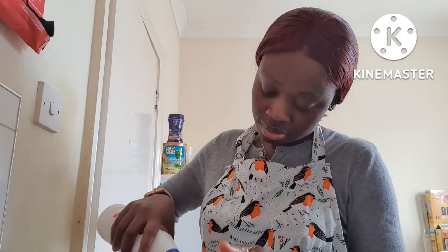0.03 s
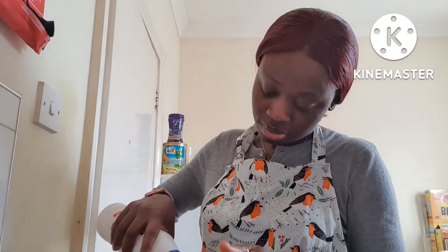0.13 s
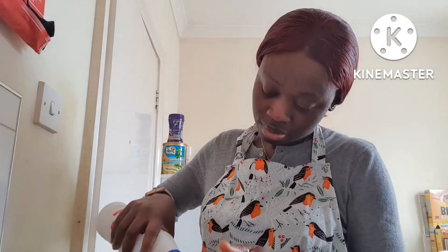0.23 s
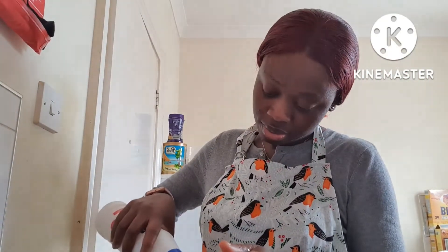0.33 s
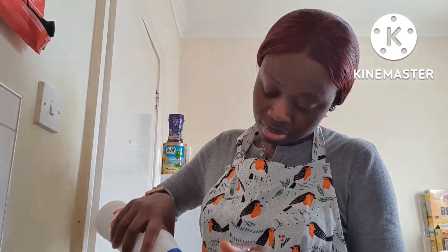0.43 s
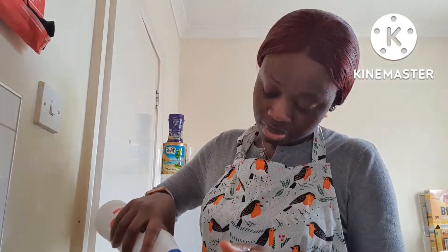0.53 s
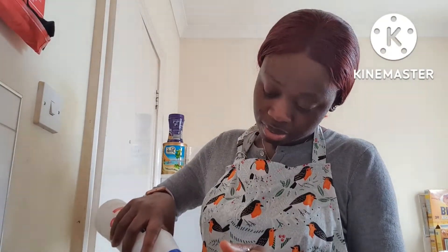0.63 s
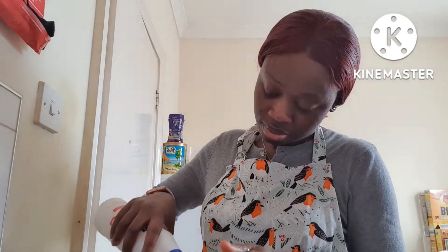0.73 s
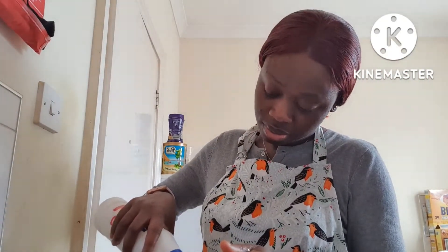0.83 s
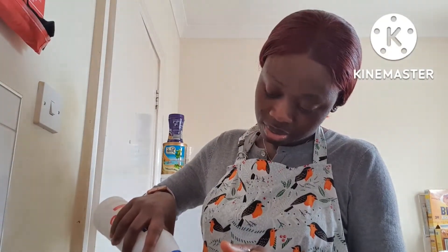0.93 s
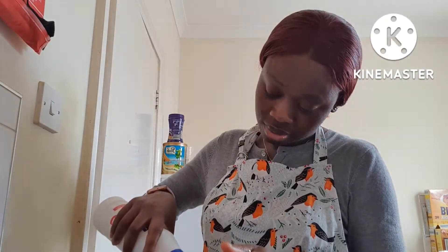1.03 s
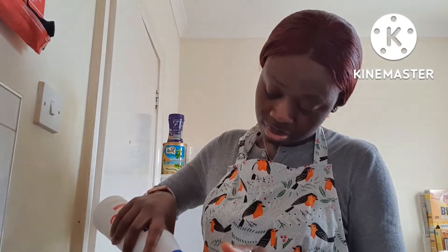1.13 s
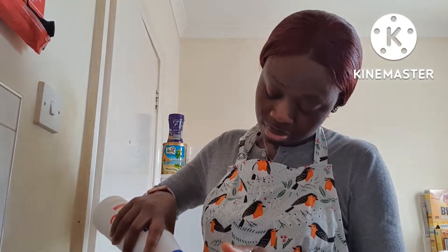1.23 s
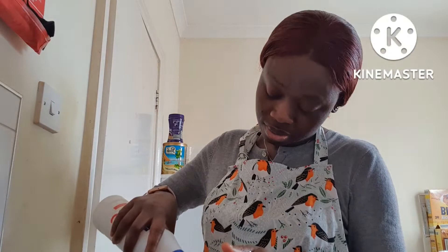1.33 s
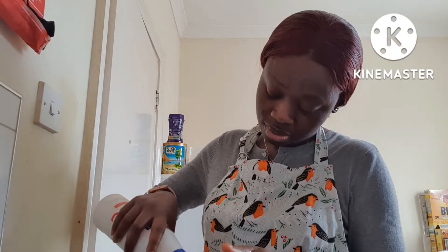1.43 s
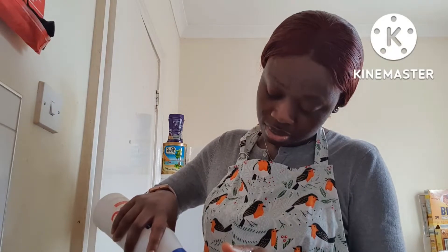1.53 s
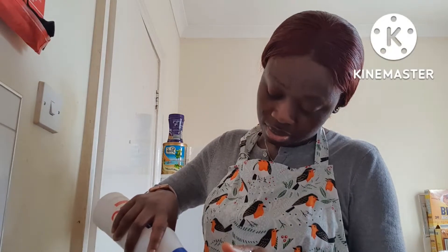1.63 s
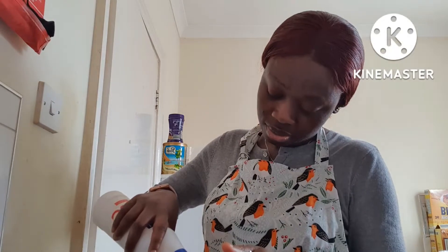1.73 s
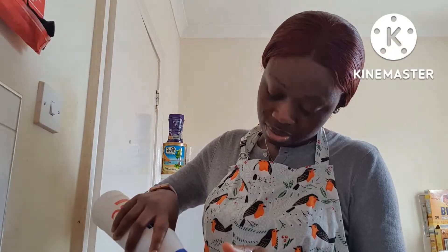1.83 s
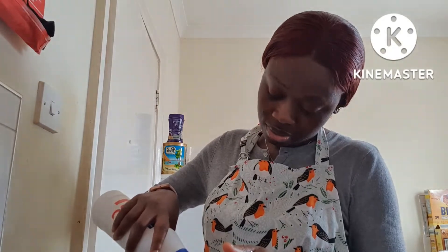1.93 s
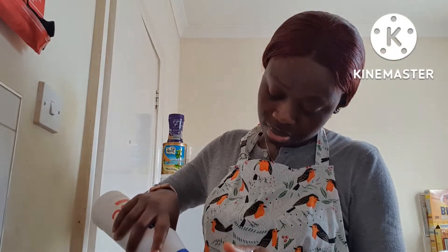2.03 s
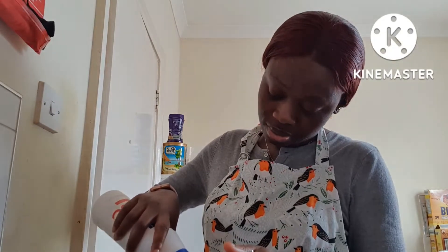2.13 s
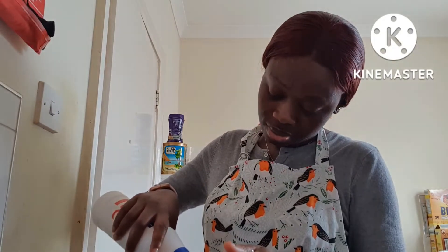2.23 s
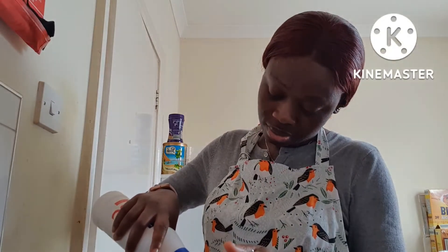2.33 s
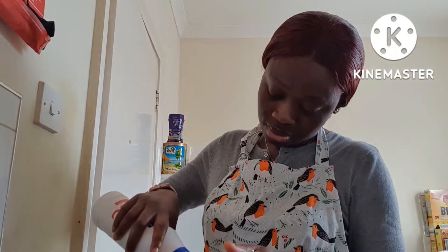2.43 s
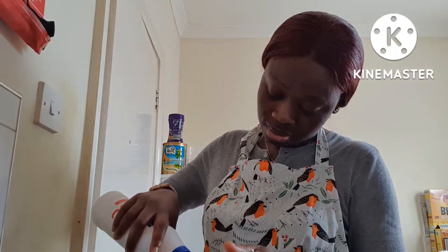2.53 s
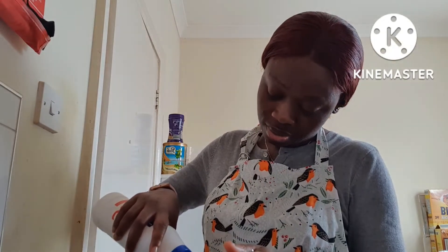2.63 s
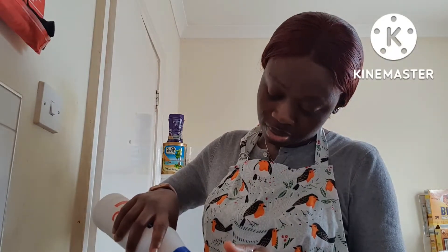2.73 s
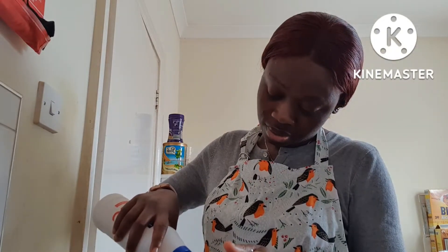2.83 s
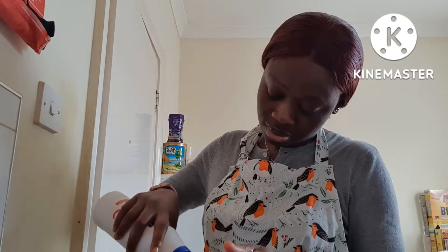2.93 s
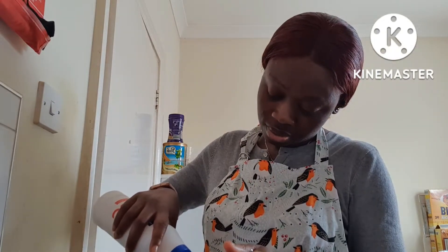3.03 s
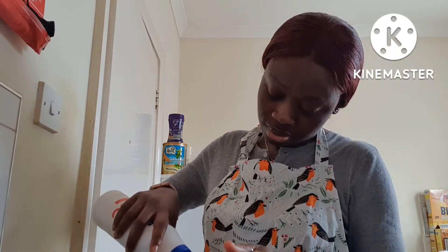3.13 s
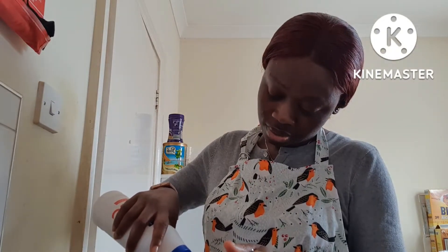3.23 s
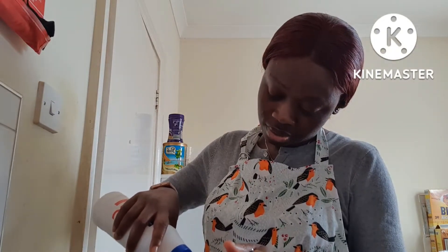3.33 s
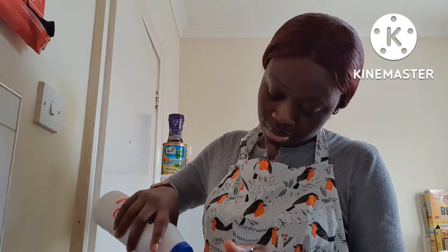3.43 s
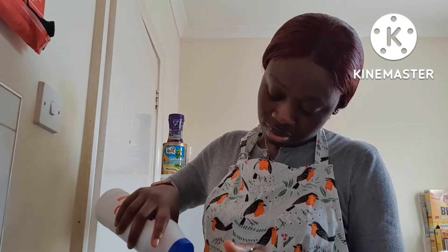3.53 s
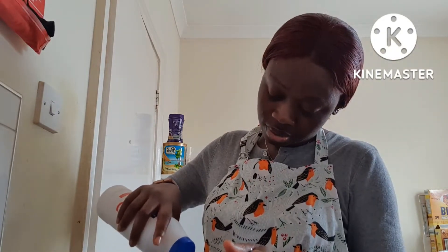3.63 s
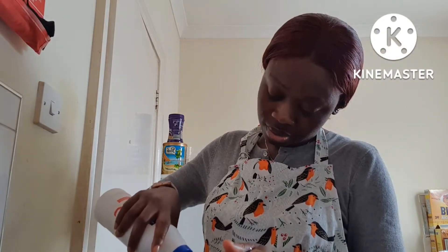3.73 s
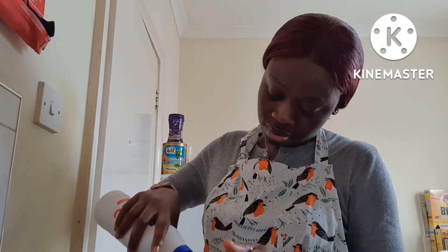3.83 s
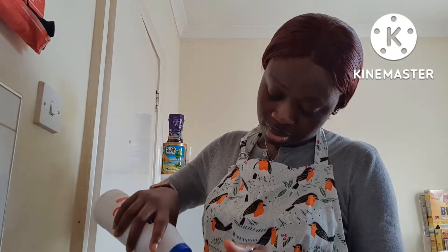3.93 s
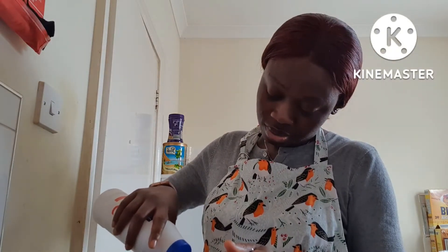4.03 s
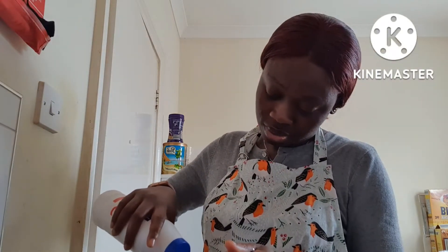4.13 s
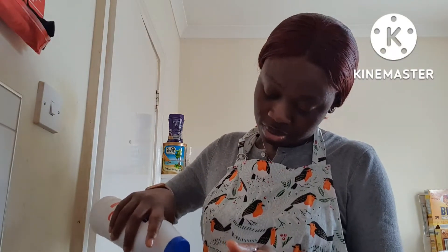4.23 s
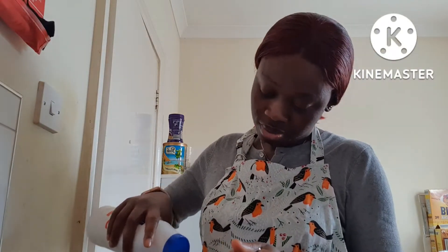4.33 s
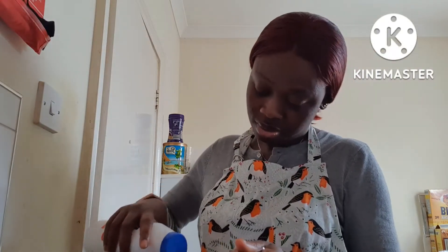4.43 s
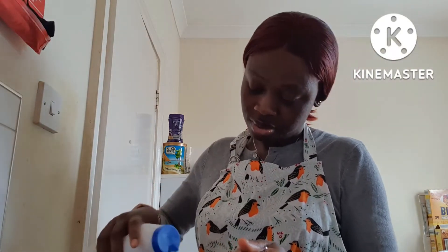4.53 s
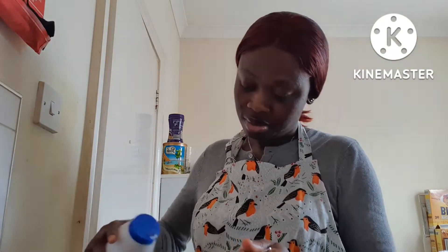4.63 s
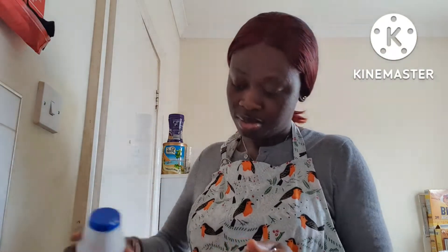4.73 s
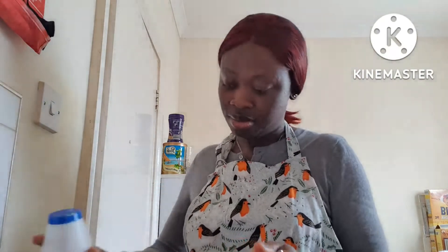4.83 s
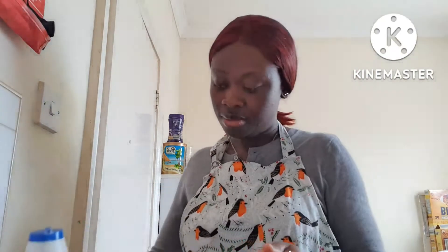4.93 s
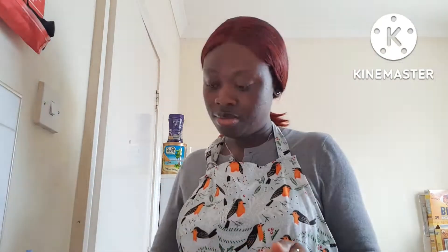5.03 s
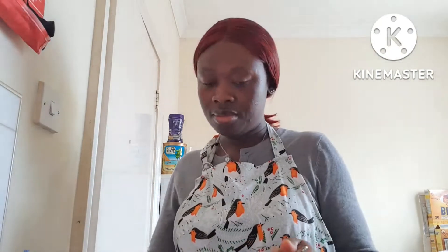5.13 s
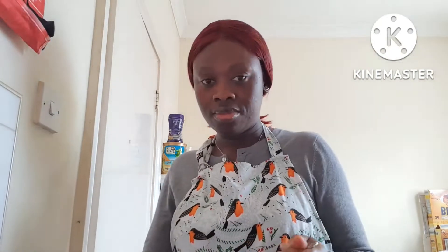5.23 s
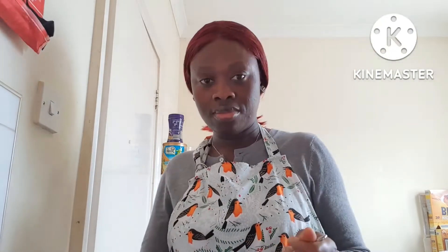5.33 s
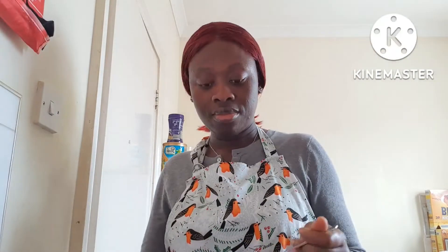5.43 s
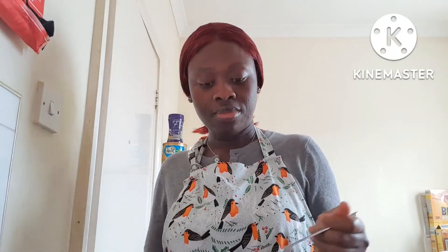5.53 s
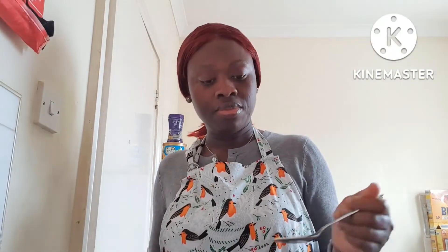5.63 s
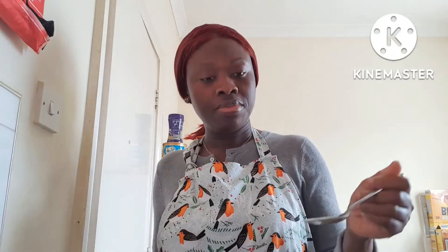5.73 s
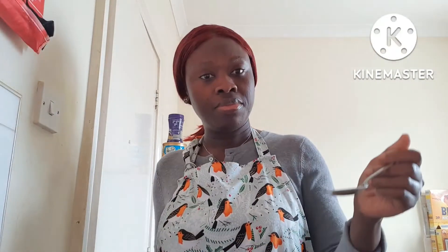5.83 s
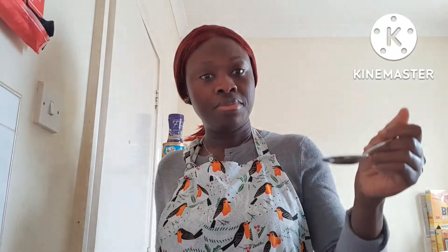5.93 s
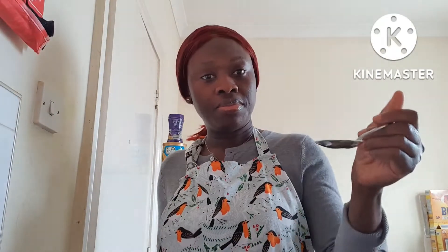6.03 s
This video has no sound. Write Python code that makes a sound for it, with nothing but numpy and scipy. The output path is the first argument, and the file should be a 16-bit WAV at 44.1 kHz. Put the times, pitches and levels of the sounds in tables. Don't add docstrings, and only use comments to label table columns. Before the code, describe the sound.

Fine salt trickles and ticks softly inside a hand-shaken plastic tub, then rushes back before a hard, hollow thump onto a kitchen worktop.

```python
import sys
import numpy as np
from scipy import signal
from scipy.fft import rfft, irfft, next_fast_len
from scipy.io import wavfile
from scipy.ndimage import uniform_filter1d, map_coordinates

SR = 44100
rng = np.random.default_rng(int(sys.argv[2]) if len(sys.argv) > 2 else 0)


def log_audio(samples):
    frames = np.atleast_2d(samples).T
    limited = np.clip(frames, -1, 1)
    pcm = np.round(limited * 32767).astype(np.int16)
    wavfile.write(sys.argv[1], SR, pcm)


def how_loud(loudness_db):
    steps = np.asarray(loudness_db, float) / 20
    return 10 ** steps


N = 268657

# (time [s], rattle level [dB], swell [s], slide [s])
SALT_SURGES = [(0.0, -75, .05, .02), (0.201, -56, 0.15, 0.27), (0.564, -57, 0.13, 0.),
               (0.7, -62.5, 0.22, 0.13), (0.8, -60.5, 0.08, .03), (0.89, -52, 0.12, 0.11),
               (1.11, -51.5, 0.19, 0.057), (1.23, -60, 0.15, 0.012), (1.33, -64.5, 0.13, 0.024),
               (1.45, -63, 0.064, 0.), (1.565, -64, 0.12, 0.01), (1.75, -64, 0.22, .04),
               (1.884, -64.5, 0.13, 0.036), (1.97, -68.5, 0.13, 0.022), (2.112, -58, .11, 0.00023),
               (2.265, -64, .08, 0.033), (2.628, -65, 0.056, 0.), (2.755, -63.5, 0.066, 0),
               (3.488, -70, 0.056, 0.0034), (3.69, -53.5, 0.03, 0.032), (4.6, -85, 0.18, 0.077),
               (4.721, -52, 0.056, 0.15), (4.785, -44.5, 0.081, .04), (4.86, -40, 0.19, 0.097),
               (5.0, -50.5, 0.055, .02)]
# (time [s], rattle level [dB], swell [s], slide [s])
HEAP_SHIFTS = [
    (5.095, -44.5, 0.0071, 0.011),
    (5.2, -59.5, 0.093, 0.11),
    (5.448, -71.5, 0.042, 0.034),
    (5.784, -73.5, 0.076, 0.051),
]
# (time [s], share of salt rushing along the wall [0-1])
TILT = [
    (0, 0.48),
    (1.2, 0.06),
    (3.3, 0),
    (3.7, 0.27),
    (4.6, 0),
    (4.82, 0.93),
    (5.04, 0.95),
    (5.1, 0),
    (6.09, 0.9),
]
# (frequency [Hz], level [dB per Hz])
TRICKLE_COLOUR = [(760, -48), (1300, -9), (1410, -21), (1590, -5.5), (1810, -6.5), (2130, -2), (3530, -2.5),
                  (3910, -6), (4530, -2), (8500, -22), (11000, -29.5), (18700, -120)]
# (frequency [Hz], level [dB per Hz])
RUSH_COLOUR = [(450, -36), (750, -33), (1610, -19), (1850, -36), (2300, -10), (3300, -5.5), (4300, -1.5),
               (5500, -4.5), (7000, -7.5), (8000, -13.5), (11000, -13), (18000, -120)]
# (frequency [Hz], level [dB per Hz])
FINE_COLOUR = [(4120, -8), (7000, -2.5), (8090, -6.5), (12100, -4), (14800, -5), (15500, -7.5),
               (16000, -30)]
# (frequency [Hz], width [Hz], lift [dB])
HOLLOW = [(2163, 31, 9), (2990, 110, 4), (3935, 300, 9.5), (4500, 90, -5.5)]
# (frequency [Hz], left-right likeness [-1 to 1])
SALT_LIKENESS = [(700, 0.83), (2000, 0.25), (5000, 0.033), (15000, 0.028)]
SWELL_DB, SWELL_BEND, FALL_DB_PER_S = 26.5, 1.34, 188
FINE_DB, FINE_GROWS, HEAP_DULL_DB = -13, 0.25, -18

# (frequency [Hz], level [dB per Hz])
RUMBLE_COLOUR = [(12, -68.5), (20, -15.5), (31, -14.5), (64, 5.5), (89, 5.5), (118, -10.5), (145, -1.5),
                 (200, -9.5), (265, -17), (300, -8), (390, -46), (660, -120)]
# (frequency [Hz], level [dB per Hz])
DRONE_COLOUR = [(120, -29.5), (200, -8.5), (244, -6), (291, -21.5), (364, -4), (440, -7), (490, -7),
                (580, -12), (713, -13.5), (1080, -9.5), (1210, -14.5), (1350, -30.5), (1700, -43.5),
                (2210, -62), (3740, -120)]
# (frequency [Hz], level [dB per Hz])
AIR_COLOUR = [(760, -27), (1300, -0.5), (1400, -5.5), (2250, -5), (3220, -13), (3460, -9), (3840, -15),
              (6500, -20.5), (7670, -22.5), (11900, -22.5), (15300, -24)]
# (frequency [Hz], level [dB rms])
SHAFT = (49.2, -60)
# (frequency [Hz], level [dB rms])
HUM = [(145.3, -64.5), (199.2, -68), (236.9, -77.5), (296.1, -66), (344.5, -75.5), (414.5, -68),
       (441.4, -64.5), (489.9, -74), (1174, -80)]
# (frequency [Hz], level [dB rms])
BEARING_WHINE = [(2850, -92.5), (3260, -92.5), (2410, -99)]
# (frequency [Hz], left-right likeness [-1 to 1])
KITCHEN_LIKENESS = [(60, 1), (150, 0.86), (380, 0.41), (950, 0.14), (2380, -0.23), (5980, 0.016),
                    (15000, -0.19)]
# (time [s], width [s], level [dB])
RUMBLE_SWELLS = [
    (0.27, .08, 4),
    (1.052, 0.31, 7.5),
    (4.87, 0.21, 4),
    (5.7, .06, -4.5),
]
RUMBLE_DB, DRONE_DB, DRIFT_DB = -55.5, -60, 0.7
DRONE_FOLLOWS = 0.87

# (time [s], thud level [dB], shell level [dB], click level [dB])
CONTACTS = [(5.065, -59, -55.5, -52), (5.0911, -7, -25.5, -18.5), (5.148, -24.5, -37, -56),
            (5.24, -30.5, -42.5, -41), (5.275, -29, -44, -53), (5.3029, -33, -42.5, -22.5),
            (5.315, -26.5, -77, -42), (5.423, -38, -51.5, -52), (5.434, -29.5, -52, -69),
            (5.464, -38, -51.5, -44), (5.479, -31, -58, -49), (5.506, -42, -70, -58),
            (5.53, -38.5, -64, -62)]
# (frequency [Hz], level [dB], t60 [s])
CUPBOARD_MODES = [(72.9, 5, 0.35), (150.7, -4, 0.31)]
# (frequency [Hz], level [dB], t60 [s])
WORKTOP_MODES = [(102.5, 0.5, 0.065), (197, -9, 0.036)]
# (frequency [Hz], level [dB], t60 [s])
AIR_SLAP = [(1050, 9, 0.002), (243, 5, 0.0063)]
# (frequency [Hz], level [dB], t60 [s])
SHELL_MODES = [(210, -6, 0.055), (350, -9, 0.048), (374.3, 1.5, 0.15), (467, -9, 0.11), (503, -10, 0.028),
               (540, -20, 0.1), (630, -16, 0.14), (774, 0.5, 0.09), (829, -2.5, 0.09), (918, -3, 0.053),
               (720, -6, 0.048), (1030, -24, 0.11), (310, -8, 0.029)]
# (frequency [Hz], level [dB], t60 [s])
RIM_MODES = [(1250, -14, 0.023), (1660, -22, 0.02), (2120, -11, 0.012), (2890, -20, 0.03)]
# (frequency [Hz], level [dB per Hz])
SLUMP_COLOUR = [(60, -30), (150, 8), (280, 2.5), (400, 9), (620, 3), (900, -5), (1300, -4), (4000, -33.5)]
# (frequency [Hz], level [dB])
CLICK_COLOUR = [(600, -10), (1300, 4), (2100, -3), (2600, 2), (3500, 5.5), (4800, -3.5), (7000, -13),
                (16000, -35)]
SET_DOWN_S = 5.091
BOOM_DB, BOOM_DB_PER_S = -7, -31
FREE, FREE_PER_S = 1.57, 0.6

# (frequency [Hz], t60 [s])
ROOM_DECAY = [(100, 1), (500, 0.35), (2000, 0.36), (10000, 0.37)]

# (time [s], level [dB], swell [s], slide [s])
SLEEVE_BRUSH = [
    (5.972, -62, 0.032, 0.029),
]
# (frequency [Hz], level [dB per Hz])
CLOTH_COLOUR = [(710, -26), (1200, 1.5), (1310, -11), (1650, -4), (2190, -8), (3010, -3.5), (4050, -5.5),
                (5000, -11), (15000, -35)]
CLOTH_FALL_DB_PER_S = 173


def unit(x):
    return x / np.sqrt(np.mean(x ** 2) + 1e-20)


def along(points, hz):
    f, v = np.transpose(points)
    return np.interp(np.log(hz + 1), np.log(f + 1), v)


def colour(points):
    return lambda hz: how_loud(along(points, hz))


def curves(rows):
    s, *cols = np.transpose(rows)
    return [np.interp(np.arange(N) / SR, s, c) for c in cols]


def sampled(gain):
    return np.interp(np.arange(N) * 1000 / SR, np.arange(len(gain)), gain)


def wobble(rate):
    knots = rng.standard_normal(int(N * rate / SR) + 4)
    places = np.arange(N * 1000 // SR + 2) * rate / 1000
    return sampled(map_coordinates(knots, [places]))


def filtered(x, response):
    m = next_fast_len(N + 8192)
    return irfft(rfft(x, m) * response(np.fft.rfftfreq(m, 1 / SR)), m)[..., :N]


def spread(pair, gain, likeness):
    def mid_side_gain(hz):
        turn = np.arccos(np.clip(along(likeness, hz), -1, 1)) / 2
        return gain(hz) * [np.cos(turn), np.sin(turn)]
    mid, side = filtered(pair, mid_side_gain)
    return unit(np.array([mid + side, mid - side]))


def patchy(depth_db):
    z = signal.stft(rng.standard_normal((2, N)), nperseg=512)[2]
    field = uniform_filter1d(rng.standard_normal(z.shape[1:]), size=5, axis=0)
    field = uniform_filter1d(field, size=6, axis=1)
    return signal.istft(z * how_loud(depth_db * unit(field)), nperseg=512)[1][:, :N]


def surge(s, db, swell, slide, fall_db=FALL_DB_PER_S):
    t = np.arange(N * 1000 // SR + 2) / 1000 - s
    rise_db = SWELL_DB * (np.clip(-t, 0, None) / swell) ** SWELL_BEND
    return how_loud(np.maximum(db - rise_db - fall_db * np.clip(t - slide, 0, None), -200))


def salt():
    power = [surge(*row) ** 2 for row in SALT_SURGES + HEAP_SHIFTS]
    fine_db = [FINE_DB + FINE_GROWS * (row[1] + 60) for row in SALT_SURGES]
    fine_db += [FINE_DB + HEAP_DULL_DB for row in HEAP_SHIFTS]
    rattle = sampled(np.sqrt(sum(power)))
    hiss = sampled(np.sqrt(sum(p * how_loud(2 * db) for p, db in zip(power, fine_db))))
    share = np.clip(curves(TILT)[0], 0, 1)

    sizes = how_loud(1.73 * rng.exponential(size=N))
    crystals = unit(sizes) * patchy(depth_db=1.3)

    def in_hollow(hz):
        lift_db = sum(db / (1 + (2 * (hz - centre) / width) ** 2) for centre, width, db in HOLLOW)
        return how_loud(along(TRICKLE_COLOUR, hz) + lift_db)

    trickle = spread(crystals, in_hollow, SALT_LIKENESS)
    rush = spread(crystals[:, ::-1], colour(RUSH_COLOUR), SALT_LIKENESS)
    fine = spread(crystals, colour(FINE_COLOUR), SALT_LIKENESS)
    coarse = np.sqrt(1 - share) * trickle + np.sqrt(share) * rush
    flutter = how_loud(0.5 * wobble(25) + 0.2 * wobble(90))
    return flutter * (rattle * coarse + how_loud(4.5) * hiss * fine)


def kitchen():
    t = np.arange(N) / SR
    swell_db = sum(db * np.exp(-((t - s) / width) ** 2) for s, width, db in RUMBLE_SWELLS)
    lumps_db = 1.3 * wobble(14) + 0.5 * wobble(45)
    rumble_db = RUMBLE_DB + swell_db + DRIFT_DB * wobble(3) + 1.0 + lumps_db
    drone_db = DRONE_DB + DRONE_FOLLOWS * swell_db - 3.5 + 0.83 * lumps_db
    rumble = how_loud(rumble_db) * spread(patchy(depth_db=0.0), colour(RUMBLE_COLOUR), KITCHEN_LIKENESS)
    drone = how_loud(drone_db) * spread(patchy(depth_db=0.33), colour(DRONE_COLOUR), KITCHEN_LIKENESS)
    air = how_loud(-77.0) * spread(rng.standard_normal((2, N)), colour(AIR_COLOUR), KITCHEN_LIKENESS)
    tones = 0
    for hz, db in [SHAFT, *HUM, *BEARING_WHINE]:
        level = how_loud(db + 1.5 + 0.67 * wobble(11))
        port_phase = np.array([[0], [hz / 2500]])
        phase = 2 * np.pi * hz * t + 1.12 * wobble(8.3) + rng.uniform(0, 6.88) + port_phase
        tones = tones + level * np.sin(phase)
    return rumble + drone + air + tones


def ring(modes, scatter_db, rise, detune=0.0):
    t = np.arange(SR // 2) / SR
    total = np.zeros(len(t))
    for k, (hz, db, t60) in enumerate(modes):
        swing = how_loud(db + scatter_db * rng.standard_normal() - 60 * t / t60)
        total += (-1) ** k * swing * np.sin(2 * np.pi * hz * t * rng.normal(1, detune))
    return total * (1 - np.exp(-t / rise))


def tub():
    low, shell, jolt = np.zeros((3, N + SR))
    click = np.zeros((2, N + SR))
    t = np.arange(SR // 2) / SR
    flex = round(0.0021 * SR)
    for s, thud_db, shell_db, click_db in CONTACTS:
        since = s - SET_DOWN_S
        at = slice(round(s * SR), round(s * SR) + len(t))

        boom_db = thud_db + BOOM_DB + BOOM_DB_PER_S * since
        freed_modes = np.multiply(WORKTOP_MODES, [1, 1, FREE + FREE_PER_S * since])
        thud = np.pad(ring(freed_modes, 0, rise=0.0021), (flex, 0))[:len(t)]
        low[at] += how_loud(boom_db) * ring(CUPBOARD_MODES, 0, rise=0.015) + how_loud(thud_db) * thud
        low[at] += how_loud((thud_db + click_db) / 2) * ring(AIR_SLAP, 0, rise=0.00034)

        shell[at] += how_loud(shell_db) * ring(SHELL_MODES, 0.86, rise=0.00026, detune=0.0074)
        shell[at] += how_loud((click_db + shell_db) / 2) * ring(RIM_MODES, 6.8, rise=0.00012, detune=0.012)
        jolt[at] += how_loud(shell_db - 60 * t / 0.089)

        tick = 2.1 * (t == t[40])
        crackle = how_loud(-60 * t / 0.016) * (1 - np.exp(-t / 0.0008)) * rng.standard_normal((2, len(t)))
        click[:, at] += how_loud(click_db) * (tick + 0.33 * crackle)
    slump = 1.36 * jolt[:N] * unit(filtered(rng.standard_normal(N), colour(SLUMP_COLOUR)))
    return low[:N], shell[:N] + slump, filtered(click[:, :N], colour(CLICK_COLOUR))


def room(x):
    hz, t, z = signal.stft(rng.standard_normal((2, SR // 2)), SR, nperseg=256)
    tail = signal.istft(z * how_loud(-60 * t / along(ROOM_DECAY, hz)[:, None]), SR, nperseg=256)[1]
    delayed = np.pad(x, (120, 0))
    return signal.fftconvolve(delayed[None], tail / np.linalg.norm(tail[0]), axes=1)[:, :N]


def sleeve():
    fibres = spread(patchy(depth_db=0.5), colour(CLOTH_COLOUR), SALT_LIKENESS)
    brush = sampled(surge(*SLEEVE_BRUSH[0], fall_db=CLOTH_FALL_DB_PER_S))
    return brush * how_loud(2.0 + 1.2 * wobble(60)) * fibres


def late(x, lag):
    return filtered(x, lambda hz: np.exp(-2j * np.pi * hz * np.array([[0], [lag]])))


def scene():
    low, shell, click = tub()
    near = late(low + shell + click, lag=0.000355) * how_loud([[0.4], [-0.4]])
    answer = how_loud(-5.5) * room(shell + click[0]) + how_loud(-43) * room(low)
    return late(salt(), lag=0.000283) + kitchen() + near + answer + sleeve()


def top_cut(x):
    return signal.sosfilt(signal.butter(12, 16250, fs=SR, output="sos"), x)


def record(dry):
    def microphone(hz):
        return (hz < 15450) * (1j * hz / (30 + 1j * hz)) ** 2
    mix = filtered(dry, microphone)
    return top_cut(mix)


dry = scene()
out = record(dry)
log_audio(out)
```